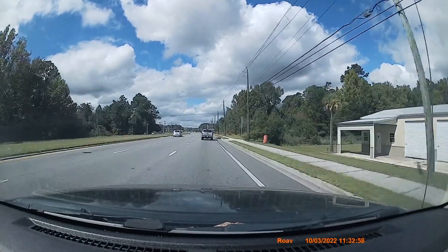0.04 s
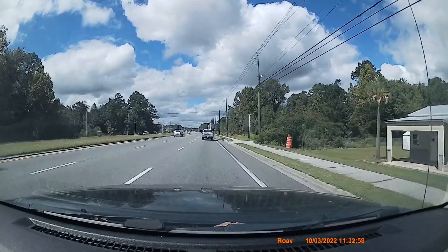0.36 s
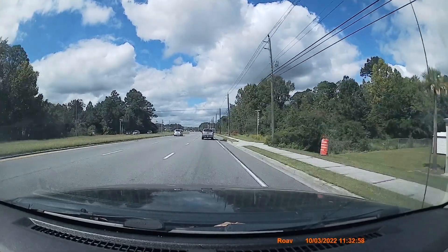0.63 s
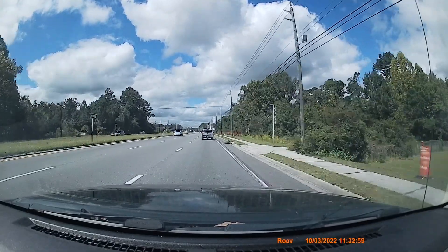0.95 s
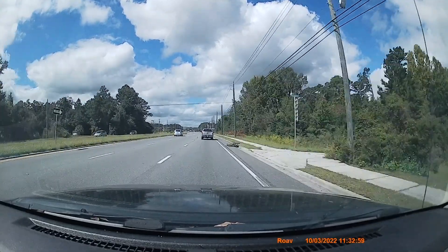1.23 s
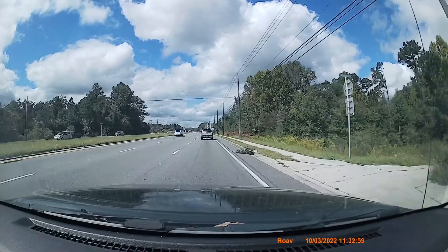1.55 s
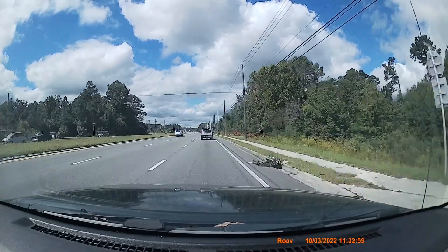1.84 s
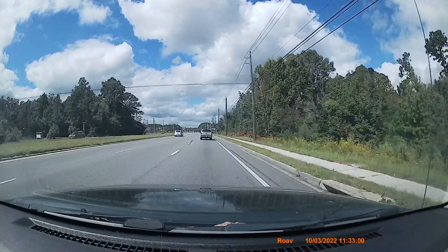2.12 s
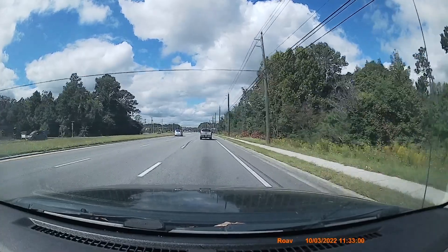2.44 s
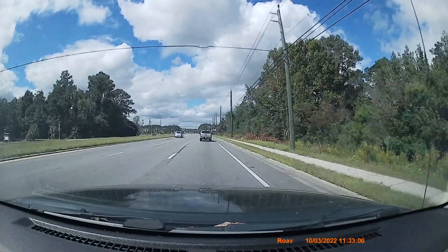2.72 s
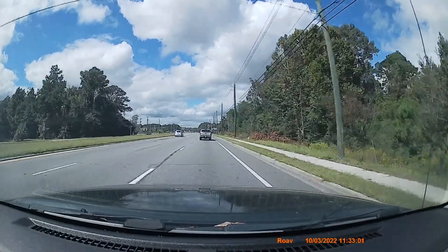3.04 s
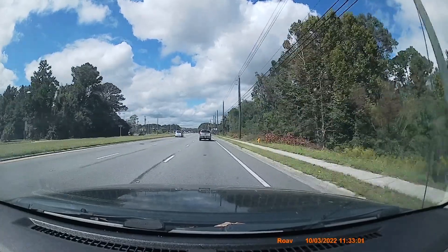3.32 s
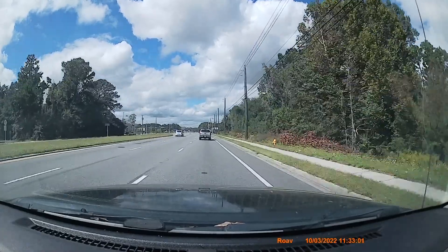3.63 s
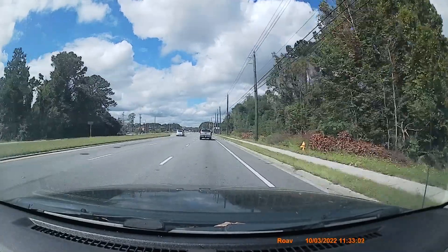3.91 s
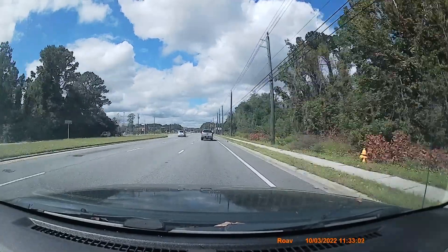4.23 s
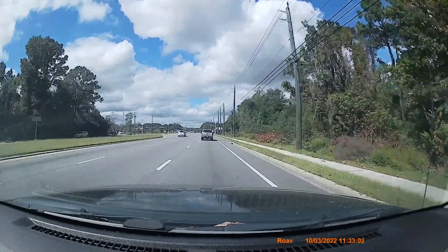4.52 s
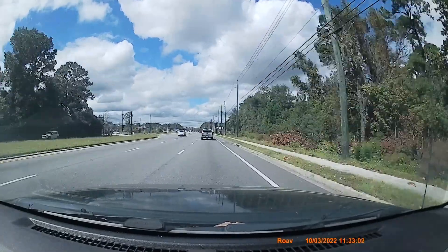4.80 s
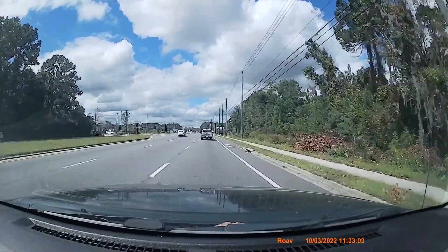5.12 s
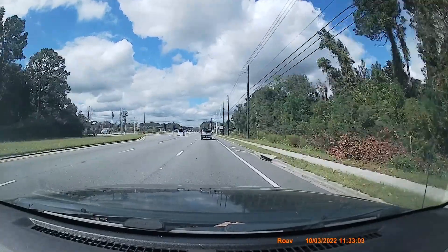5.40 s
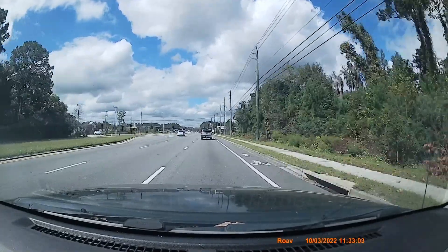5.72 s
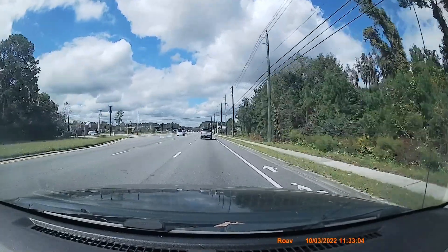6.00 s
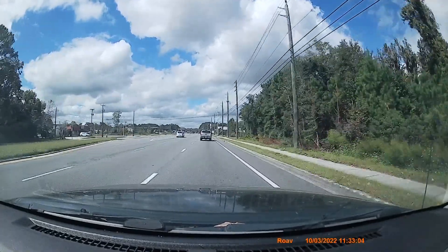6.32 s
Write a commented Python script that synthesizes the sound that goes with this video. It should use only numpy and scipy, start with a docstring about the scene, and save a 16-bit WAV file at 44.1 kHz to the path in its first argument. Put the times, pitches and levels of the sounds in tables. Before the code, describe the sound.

From the start, a steady low road rumble with a soft tyre rush fills the cabin of a car cruising on a highway. Over it, an unevenly worn front tyre drones with a low hum that throbs nine or ten times a second and wavers in strength. Its pitch sinks very slightly as the car slows a little. The engine's low boom dips near 2 seconds, rises from about 2.5 seconds and is strongest from about 4.5 to 6 seconds, where the throbbing is also more marked. Brief, soft low swells pass through the rumble, several in the first second or so and others later. A faint, short hollow tone sounds once at about 2.2 seconds. Plastic trim ticks lightly now and then, most clearly near 3.6 and 5.1 seconds. The drone and rumble continue to the end at about 6.5 seconds.

```python
"""Highway drone inside a vehicle

The vehicle slows very slightly. An unevenly worn front tyre drones and throbs once a wheel turn;
the engine's boom swells as the speed levels off. Road rumble with brief low swells fills the
cabin; plastic trim ticks now and then, and a soft hollow tone swells briefly once."""
import sys
import numpy as np
from scipy import signal
from scipy.fft import rfft, irfft
from scipy.io import wavfile
from scipy.ndimage import uniform_filter1d

SR = 44100
rng = np.random.default_rng(int(sys.argv[2]) if len(sys.argv) > 2 else 0)


def waveform_to_disk(signal):
    """Save audio, clipped to [-1, 1], as 16-bit WAV at the path in sys.argv[1]."""
    frames = np.transpose(np.atleast_2d(signal))
    scaled = np.clip(frames, -1, 1) * 32767
    samples = np.round(scaled).astype(np.int16)
    wavfile.write(sys.argv[1], SR, samples)


N = 288855


def gain_of(db):
    """Decibels to amplitude."""
    return 10 ** (np.asarray(db) / 20)


def unit_rms(x):
    """Scale to rms 1."""
    return x / np.sqrt(np.mean(x ** 2) + 1e-20)


def unit_burst(x):
    """Scale the loudest 5 ms to rms 1."""
    return x / np.sqrt(uniform_filter1d(x ** 2, size=220).max())


def curve(rows):
    """(time [s], value) rows to one value per sample."""
    return np.interp(np.arange(N) / SR, *np.transpose(rows))


def add(mix, at_s, sound):
    """Mix a sound in at at_s."""
    part = mix[max(round(at_s * SR), 0):][:len(sound)]
    part += sound[:len(part)]


def drift(rate_hz):
    """Slow random wander, rms 1."""
    hz = np.fft.rfftfreq(N, 1 / SR)
    return unit_rms(irfft(rfft(rng.standard_normal(N)) * np.exp(-(hz / rate_hz) ** 2), N))


def tone(cycles, rms_db, waver_db):
    """Vibration locked to a turning part, its level wavering."""
    return np.sqrt(2) * gain_of(rms_db + waver_db * drift(5.8)) * np.cos(2 * np.pi * cycles)


def ringing(modes, t):
    """Sum of decaying sines."""
    return sum(gain_of(db - 60 * t / t60_s) * np.sin(2 * np.pi * hz * t) for hz, db, t60_s in modes)


def fizz(vibration, level_db=-60, floor=0.18, flicker_db=1.0):
    """Faint hiss that swells where the vibration moves fastest."""
    lowpass = signal.butter(2, 600, fs=SR, output="sos")
    velocity = np.gradient(signal.sosfilt(lowpass, vibration))
    agitation = np.sqrt(abs(uniform_filter1d(unit_rms(velocity) ** 2, size=60)))
    gain = gain_of(level_db + flicker_db * drift(25))
    return gain * unit_rms(floor + agitation) * rng.standard_normal(N)


def road(wheel_hz, rumble_db=-0.27, waver_db=1.5, rush_db=-0.65):
    """Tyre noise through the body: rumble and hollow roar follow the surface, rush the speed."""
    # road noise in the cabin: (frequency [Hz], base density [dB/Hz])
    spectrum = [(10, -73.5), (24, -43.5), (40, -39), (62, -47.5), (122, -48), (160, -54.5), (235, -53.5),
                (280, -59), (500, -67), (950, -71.5), (1600, -82), (2200, -90), (3500, -100), (8000, -116)]
    # cabin and tyre resonances: (frequency [Hz], width [Hz], lift [dB])
    resonances = [(124.4, 24, 4), (318, 27, 4), (466.6, 41, 7), (604.5, 39, 4), (636, 25, 2.5),
                  (755.5, 36, 7.5), (936, 49, 3.5), (997, 21, 3), (1220, 13, 0), (1570, 71, 1.5),
                  (1674, 39, 6), (1910, 31, 0.5), (2700, 49, 1)]
    # asphalt coarseness: (time [s], roar gain [dB])
    surface = [(0, -0.25), (.6, 1), (2, -0.5), (4.2, 0.1), (5.4, 2.15), (6.55, 0.3)]
    hz = np.fft.rfftfreq(N, 1 / SR) + 1
    points_hz, points_db = np.transpose(spectrum)
    base_db = np.interp(np.log(hz), np.log(points_hz), points_db)
    lift_db = sum(db / (1 + (2 * (hz - mode_hz) / width_hz) ** 2) for mode_hz, width_hz, db in resonances)
    noise = rfft(rng.standard_normal(N)) * gain_of(base_db + lift_db) * np.sqrt(SR / 2)
    low, high = 1 / (1 + (hz / 110) ** 4), 1 / (1 + (600 / hz) ** 4)
    coarse_db = curve(surface)
    rumble = irfft(noise * low, N) * gain_of(rumble_db + 0.69 * coarse_db + waver_db * drift(8.3))
    roar = irfft(noise * (1 - low - high), N) * gain_of(coarse_db)
    rush = irfft(noise * high, N) * gain_of(rush_db) * (wheel_hz / wheel_hz.mean()) ** 2.7
    return rumble + roar + rush


def rumble_swells(pitch_hz=39, length_s=0.075, gain_db=-2):
    """Brief swells in the rumble, each a few low cycles long."""
    # low swells: (time [s], relative level [dB])
    swells = [(0.199, -16), (0.571, -9), (0.911, -14), (1.179, -11.5), (2.698, -13.5), (3.56, -17),
              (3.897, -15), (5.267, -9.5), (5.689, -11.5)]
    t, out = np.arange(0, length_s, 1 / SR), np.zeros(N)
    envelope = np.sin(np.pi * (t / length_s) ** 0.63) ** 2
    swell = envelope * np.sin(2 * np.pi * pitch_hz * t)
    for at_s, level_db in swells:
        add(out, at_s, gain_of(level_db + gain_db) * swell)
    return out


def hollow_swell(rise_s=0.0095):
    """Two soft tones near 500-600 Hz swell briefly and die."""
    # hollow swell: (time [s], gain [dB])
    swells = [(2.24, -26.5)]
    # its tones: (frequency [Hz], relative level [dB], t60 [s])
    partials = [(505, -4, 0.084), (608, -2.5, 0.14)]
    t, out = np.arange(SR // 5) / SR, np.zeros(N)
    for at_s, gain_db in swells:
        add(out, at_s, gain_of(gain_db) * np.minimum(t / rise_s, 1) * ringing(partials, t))
    return out


def trim(swell_s=0.0037, ring_gain_db=-3.5, snap_gain_db=-7.5, faint_per_s=4):
    """Plastic chatters on plastic in tiny slips: a bright snap and the panel's ring."""
    # trim ticks: (peak time [s], relative ring level [dB], relative snap level [dB])
    ticks = [(0.224, -42.5, -49), (0.504, -44, -61), (0.539, -49, -50), (0.632, -51, -52),
             (1.187, -44.5, -48), (1.767, -49, -50), (3.443, -43.5, -56), (3.616, -34.5, -50),
             (3.977, -50, -46), (4.035, -44, -53), (4.292, -45, -47), (4.331, -45, -57), (4.645, -41, -55),
             (5.101, -33.5, -47), (5.201, -44, -55), (5.824, -46, -59)]
    # panel modes: (frequency [Hz], relative level [dB], t60 [s])
    modes = [(1500, -7.5, .015), (1710, -0.5, 0.027), (1900, 2.5, 0.022), (2100, -3, 0.013),
             (2320, -2.5, 0.013), (2550, -2, .015), (2820, -7.5, 0.012), (3600, -11.5, 0.033),
             (3900, -12, .008)]
    t, out = np.arange(SR // 12) / SR, np.zeros(N)
    panel = ringing(modes, t)
    treble = signal.butter(2, [2700, 5600], "band", fs=SR, output="sos")
    draws = rng.random((int(faint_per_s * N / SR), 2))
    faint_ticks = [(at * N / SR, -60 + 6 * size, -65 + 6 * size) for at, size in draws]
    for peak_s, ring_db, snap_db in list(ticks) + faint_ticks:
        chatter = t / swell_s * np.exp(1 - t / swell_s) * rng.standard_normal(len(t))
        ring = gain_of(ring_db + ring_gain_db) * unit_burst(signal.fftconvolve(chatter, panel)[:len(t)])
        snap = gain_of(snap_db + snap_gain_db) * unit_burst(signal.sosfilt(treble, chatter))
        add(out, peak_s - swell_s, ring + snap)
    return out


def drone(turns, axle_ratio=3.7, firings_per_rev=4, tread_order=24, whine_order=47, cruise_db=-22):
    """Engine firings and worn tread blocks; under load, adjacent wheel orders beat once a turn."""
    # engine boom, standing for drivetrain load: (time [s], level [dB])
    boom = [(0, -34.8), (1.2, -32), (1.95, -42), (2.55, -28.5), (4.65, -22.5), (6.2, -22.5), (6.55, -25.5)]
    # worn tread's drone: (time [s], level [dB])
    tread_levels = [(0, -29.5), (1.25, -23), (1.8, -30.5), (2.65, -25), (2.93, -31), (3.15, -20.5),
                    (3.4, -29), (3.95, -26.5), (4.3, -33.5), (4.7, -26), (6.1, -31), (6.55, -34)]
    # weak tones of the out-of-round tyre and drive shaft: (order [cycles per wheel turn])
    weak_orders = [2, 3, 3.7, 6, 7.4, 8, 9, 11, 16, 22, 22.2, 23, 27, 41, 43, 44, 46]
    # strength of each weak tone: (relative level [dB])
    weak_db = [-49.5, -42, -39, -39.5, -38, -44, -41.5, -46, -52, -47.5, -41.5, -48.5, -52, -54.5, -63,
               -50.5, -52.5]
    boom_db = curve(boom)
    load_db = boom_db - cruise_db
    engine = tone(turns * axle_ratio * firings_per_rev, boom_db, waver_db=1.0)
    tread = tone(turns * tread_order, curve(tread_levels), waver_db=0.47)
    neighbour = tone(turns * (tread_order + 1), rms_db=-29.5 + 0.96 * load_db, waver_db=1.5)
    whine = tone(turns * whine_order, rms_db=-39.5 + 1.6 * load_db, waver_db=1.0)
    shake = sum(tone(turns * k + rng.random(), db, waver_db=3.0) for k, db in zip(weak_orders, weak_db))
    return engine + tread + neighbour + whine + shake * gain_of(1.5 + 0.24 * load_db)


def scene():
    """Mono cabin mix; everything that turns is geared to the wheels."""
    # road speed: (time [s], wheel rate [Hz])
    speed = [(0.0, 9.967), (0.7, 9.832), (1.5, 9.683), (2.0, 9.624), (3.0, 9.545), (4.0, 9.48),
             (5.0, 9.436), (6.0, 9.397), (6.55, 9.379)]
    wheel_hz = curve(speed)
    turns = 0.265 + np.cumsum(wheel_hz) / SR
    vibration = drone(turns) + road(wheel_hz) + rumble_swells()
    return (vibration + fizz(vibration) + trim() + hollow_swell())[None]


def record(dry):
    """Steep low-pass at 8 kHz."""
    lowpass = signal.firwin(111, 8000, window=("kaiser", 8), fs=SR)
    return signal.oaconvolve(dry, lowpass[None], "same")


dry = scene()
out = record(dry)
waveform_to_disk(out)
```